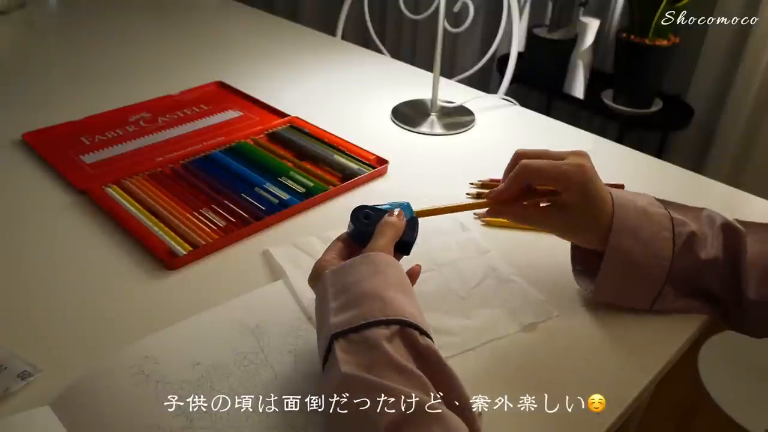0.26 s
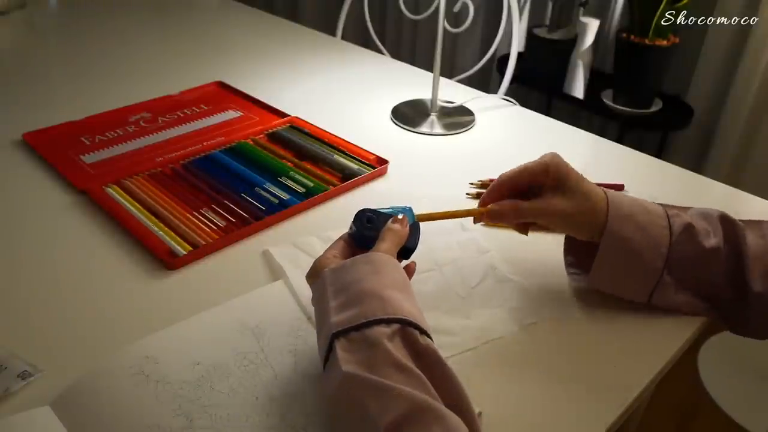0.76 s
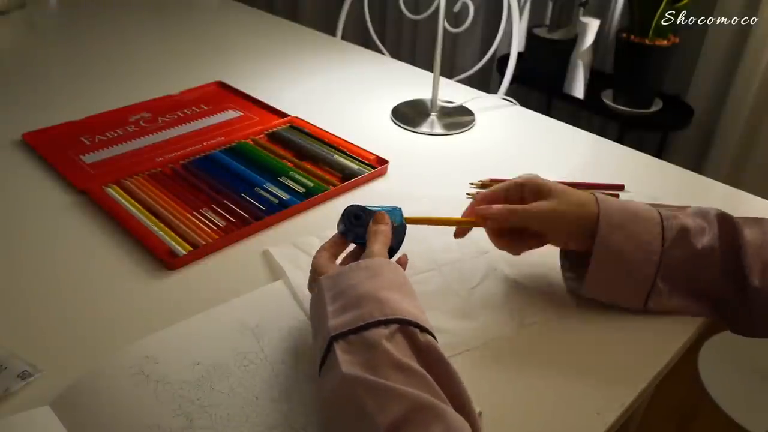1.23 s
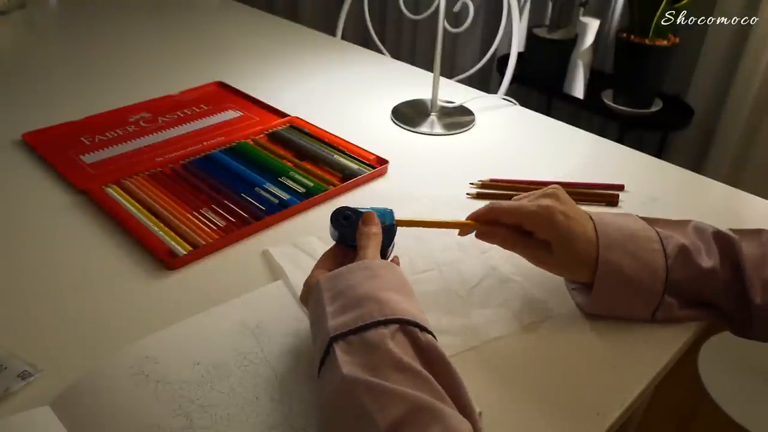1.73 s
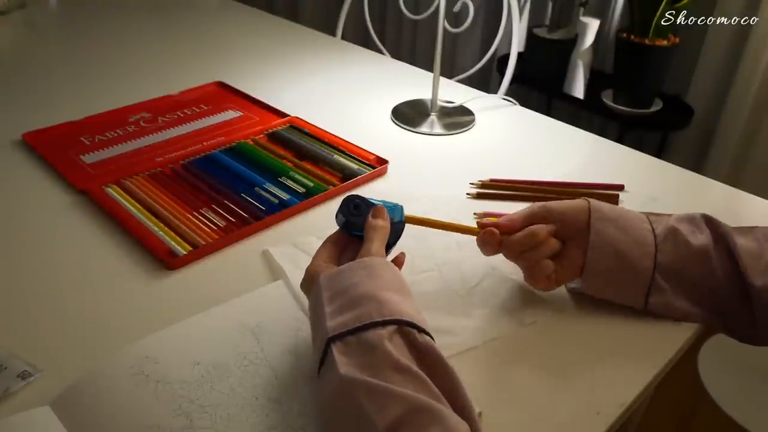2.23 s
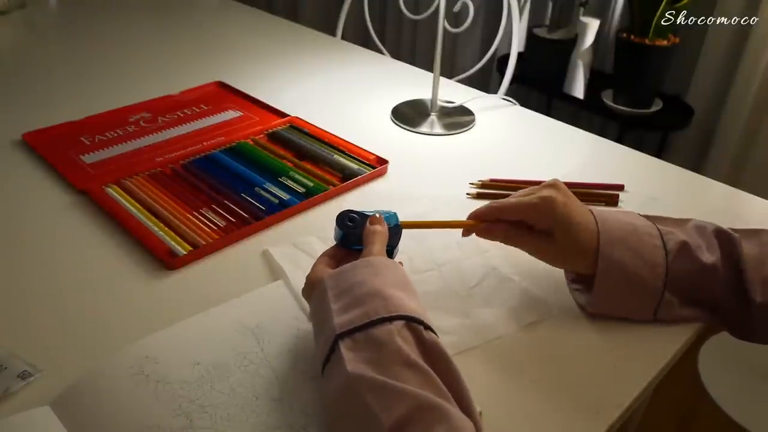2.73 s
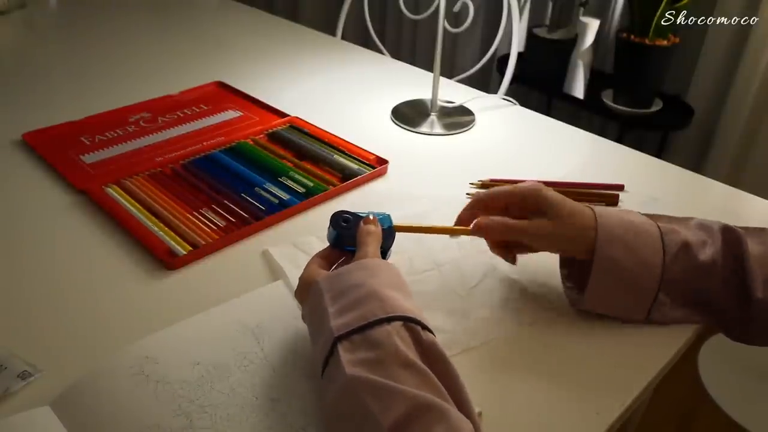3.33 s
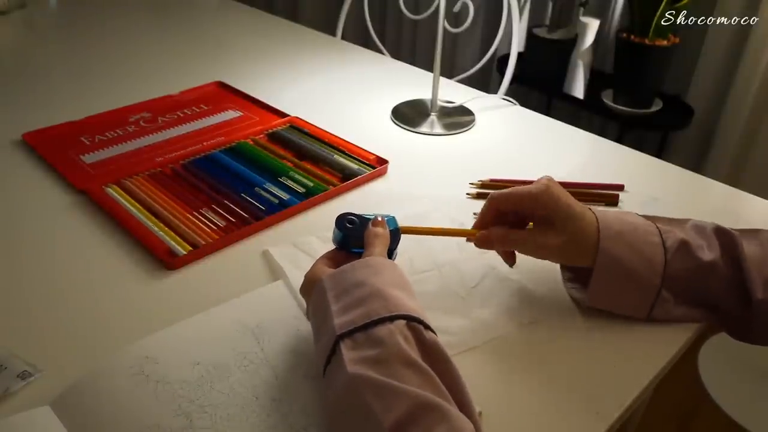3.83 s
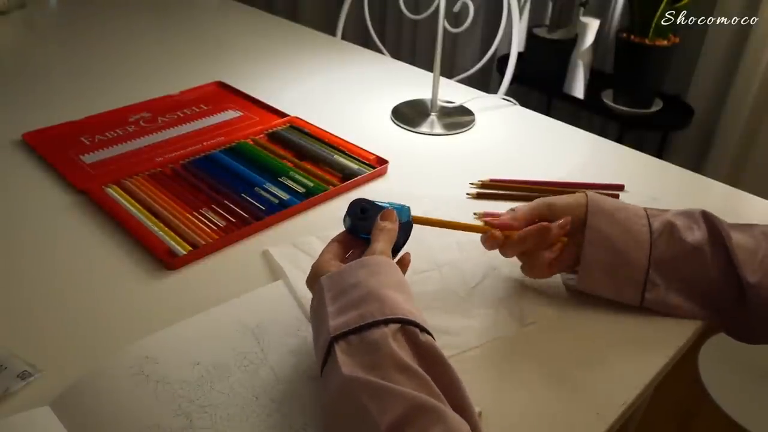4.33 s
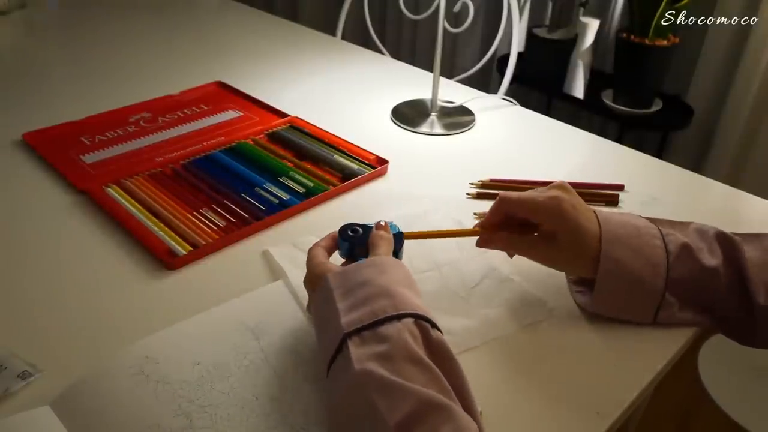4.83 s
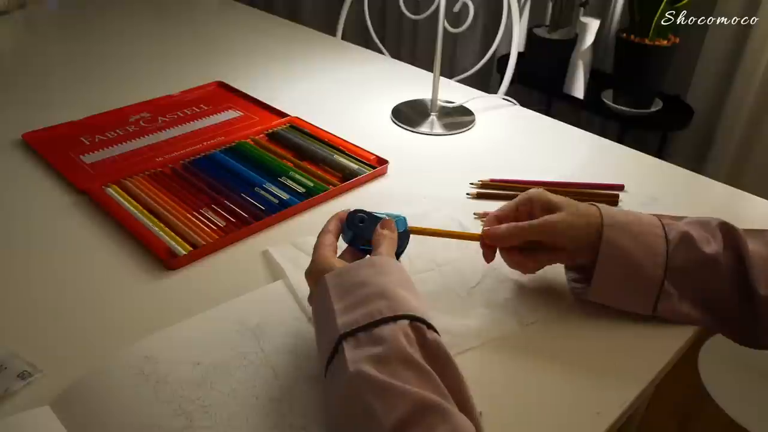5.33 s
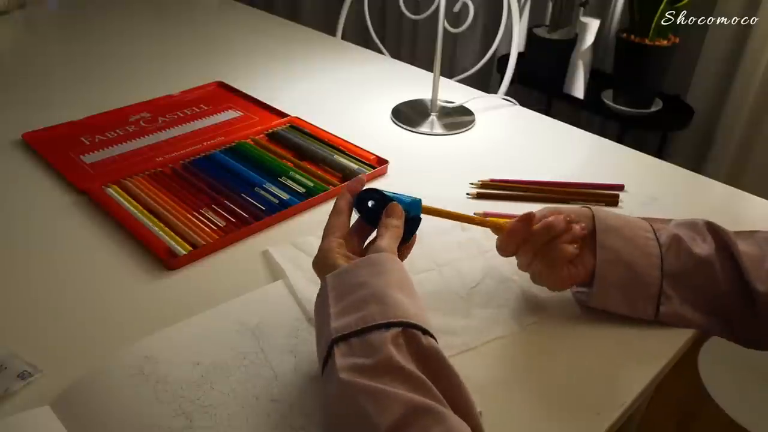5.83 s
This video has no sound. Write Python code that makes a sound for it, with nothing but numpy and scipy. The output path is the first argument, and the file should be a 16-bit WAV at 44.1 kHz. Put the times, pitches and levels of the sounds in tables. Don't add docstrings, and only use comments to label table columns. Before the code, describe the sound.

A wooden pencil is twisted in a small plastic sharpener in crisp separate scrapes with sharp snaps, while water faintly trickles and plops in a quiet room.

```python
import sys
import numpy as np
from scipy import signal
from scipy.fft import rfft, irfft, next_fast_len
from scipy.io import wavfile

SR = 44100
rng = np.random.default_rng(int(sys.argv[2]) if len(sys.argv) > 2 else 0)


def dump(signal):
    limited = np.clip(np.atleast_2d(signal).T, -1, 1)
    pcm = np.round(limited * 32767).astype(np.int16)
    wavfile.write(sys.argv[1], SR, pcm)


def boost(x):
    u = np.asarray(x, float) / 20
    return 10 ** u


N = 267687


def rms_one(x):
    return x / np.sqrt(np.mean(x ** 2) + 1e-20)


def in_time(rows):
    s, *columns = np.transpose(rows)
    return [np.interp(np.arange(N) / SR, s, column) for column in columns]


def at_hz(points, hz):
    point_hz, value = np.transpose(points)
    return np.interp(np.log(hz), np.log(point_hz), value)


def drift(rate_hz):
    r = np.exp(-2 * np.pi * rate_hz / SR)
    white = rng.standard_normal(N + SR)
    return rms_one(signal.lfilter([1], [1, -2 * r, r * r], white)[SR:])


def body(x, modes, order=1, sway=None):
    out = 0
    for k, (hz, width_hz, level_db) in enumerate(modes):
        r = np.exp(-np.pi * width_hz / SR)
        section = [(1 - r * r) / 2, 0, (r * r - 1) / 2, 1, -2 * r * np.cos(2 * np.pi * hz / SR), r * r]
        gain = boost(level_db)
        if sway is not None:
            gain = gain * sway[k % len(sway)]
        sign = (-1) ** k
        out = out + sign * gain * signal.sosfilt([section] * order, x)
    return out


def grains(per_s, spread_db, clump_db, clump_hz):
    uneven_db = spread_db * np.minimum(rng.exponential(1, N), 4)
    sizes = boost(uneven_db + clump_db * drift(clump_hz))
    signs = rng.choice([-1, 1], N)
    struck = rng.random(N) < per_s / SR
    return rms_one(sizes * signs * struck)


# (time [s], blade level [dB])
PULLS = [
    [(0.64, -64), (0.67, -52.5), (0.79, -45.5), (0.99, -48.5), (1.05, -38.5), (1.08, -33.5), (1.125, -48),
     (1.23, -66)],
    [(1.908, -37), (1.914, -49), (1.951, -50), (2.043, -53), (2.135, -42.5), (2.247, -43), (2.315, -63.5),
     (2.345, -64)],
    [(2.778, -42), (2.785, -41.5), (2.843, -50), (3.027, -40.5), (3.075, -43.5), (3.105, -36.5),
     (3.233, -53.5), (3.4, -77.5)],
    [(3.75, -67), (3.791, -65), (3.949, -51), (4.053, -45.5), (4.101, -48)],
    [(4.11, -40.5), (4.148, -43), (4.23, -43), (4.284, -41), (4.34, -49), (4.406, -67), (4.432, -66)],
    [(4.9, -65), (4.95, -59.5), (4.988, -65), (4.996, -49.5), (5.078, -52.5), (5.116, -59)],
    [(5.127, -47), (5.175, -54.5), (5.24, -49.5), (5.29, -46.5), (5.44, -51.5), (5.455, -54.5), (5.5, -47),
     (5.516, -42)],
    [(5.524, -34.5), (5.548, -37.5), (5.76, -48), (5.784, -48), (5.885, -52.5), (5.94, -82)],
]
# (shell level [dB], pencil level [dB], shaving level [dB],
# pencil gain through the pull [dB], shell gain through the pull [dB])
GRIPS = [(-16, -7.5, 0.8, 13, 3), (-11.5, -2.5, 2.5, -9, -1), (-14, -1.5, 1, 5, -2), (-10, -8.5, 3, 12, 7),
         (-11.5, 1, 5, 7, 3), (-1, 3.5, 3, -2, -12), (-2, 1.5, 3.5, -3, -7), (-13, -3, 1, 8, 1)]
# (time [s], blade level [dB])
REST = [(0, -67), (.55, -68), (1.3, -68), (1.85, -71), (2.38, -63), (2.46, -67.5), (2.7, -70), (3.7, -73),
        (4.5, -66), (4.9, -68), (6.07, -71.5)]


def twist():
    fidget_db, shell_swell_db, shaving_yield = 2.5, 2.5, 0.05
    t = np.arange(N) / SR
    blade_db = in_time(REST)[0] + fidget_db * drift(6.8)
    shell_db, pencil_db, shaving_db = np.full(N, -4.), np.full(N, -1.5), np.full(N, -2.5)
    for pull, (shell, pencil, shaving, pencil_gain, shell_gain) in zip(PULLS, GRIPS):
        s, db = np.transpose(pull)
        inside = (t >= s[0]) & (t < s[-1] + .01)
        along = np.clip((t[inside] - s[0]) / (s[-1] - s[0]), 0, 1)
        blade_db[inside] = np.interp(t[inside], s, db)
        swell_db = shell_swell_db * (np.sin(np.pi * along) - .5)
        shell_db[inside] = shell + shell_gain * (along - .5) + swell_db
        pencil_db[inside] = pencil + pencil_gain * (along - .5)
        shaving_db[inside] = shaving - shaving_yield * (blade_db[inside] + 48)
    return blade_db, shell_db, pencil_db, shaving_db


# (time [s], on the blade [0-1], in the cone [0-1])
SEAT = [(.66, 0.05, .01), (.85, 0.14, .01), (1.0, 0.06, 0.17), (1.2, 0.2, 0.24), (1.9, 0.54, 0.5),
        (2.1, 1, 0.22), (2.3, 0.55, 0.66), (2.9, 1, 0.97), (3.1, 0.92, 0.83), (3.8, .98, 0.55),
        (4.15, 0.27, 0), (4.3, 0.25, 0.38), (5.0, .8, 0.5), (5.15, 0.3, 0.17), (5.3, 0.3, 0.17),
        (5.5, 0, 0.13), (5.58, 0.2, 0.23), (5.9, 0.7, 0.3)]
# (frequency [Hz], width [Hz], level [dB])
BLADE_LOOSE = [(6160, 490, 21), (6530, 2000, -2.5), (7900, 720, -20)]
BLADE_TIGHT = [(6695, 1210, 5.7), (6910, 2270, 0.44), (7850, 1100, 2.7)]
# (frequency [Hz], width [Hz], level [dB])
PENCIL_LOOSE = [(3170, 400, -10), (4700, 750, 0), (5600, 900, -2)]
PENCIL_TIGHT = [(3450, 720, 7.5), (4220, 610, 12.9), (4790, 820, 7.3)]
# (frequency [Hz], width [Hz], level [dB])
SHELL = [(924, 670, -1.5), (1707, 167, 3), (1824, 166, 7), (1902, 860, -1), (2900, 1120, -10)]
# (frequency [Hz], width [Hz], level [dB])
SHAVING = [(8530, 2900, -5), (10550, 1870, -7), (12360, 2050, -5), (13170, 490, -4.5), (14150, 3700, -3),
           (15000, 3400, -8)]


def scrape(blade_db, shell_db, pencil_db, shaving_db):
    on_blade, in_cone = np.clip(in_time(SEAT), 0, 1)
    rub = boost(-2) * rng.standard_normal(N)
    tear = grains(5000, spread_db=2.6, clump_db=2.2, clump_hz=130) + rub
    grip = [boost(3.2 * drift(3)) for finger in range(4)]

    def rung(modes):
        return rms_one(body(tear, modes, order=2, sway=grip))

    blade = np.sqrt(1 - on_blade) * rung(BLADE_LOOSE) + np.sqrt(on_blade) * rung(BLADE_TIGHT)
    pencil = np.sqrt(1 - in_cone) * rung(PENCIL_LOOSE) + np.sqrt(in_cone) * rung(PENCIL_TIGHT)
    parts = blade + boost(pencil_db) * pencil
    parts = parts + boost(shell_db) * rung(SHELL) + boost(shaving_db) * rung(SHAVING)
    return boost(blade_db - 2.5) * parts


# (time [s], peak level [dB], pitch [Hz], relative level of shell and pencil [dB])
SNAPS = [(0.7647, -30.5, 5700, -11), (0.8797, -33.5, 6100, -20), (1.0002, -31, 7800, -7),
         (1.0113, -31, 8800, -6), (1.0693, -21.5, 5770, -29), (1.092, -35, 5000, -10),
         (1.8812, -38, 6340, -2), (1.9097, -31, 11000, -16), (2.0933, -32, 8040, -2),
         (2.3623, -39, 13000, -10), (2.7767, -13.5, 7600, -16), (2.8502, -24, 7740, -9),
         (2.876, -32, 7800, -3), (2.906, -26, 7550, -16), (3.0183, -31, 8260, 0), (3.127, -22, 7140, -9),
         (3.7866, -38.5, 7860, -11), (3.8539, -36, 7900, -17), (4.0794, -28, 5200, -1),
         (4.1043, -19, 5300, -12), (4.2755, -23.5, 8400, -21), (4.9465, -42, 2000, -7),
         (4.9922, -33.5, 7900, -19), (5.0475, -29.5, 10260, -4), (5.1223, -21.5, 3240, -12),
         (5.265, -31, 4400, -12), (5.4489, -31, 5000, 3), (5.479, -27, 5860, 3), (5.52, -24, 7800, -14),
         (5.779, -27, 7600, 0)]


def snaps(rows):
    out, t = np.zeros(N + SR), np.arange(SR // 20) / SR
    fall = np.exp(-t / 0.00074) + boost(-20.5) * np.exp(-t / 0.065)
    cracks = rng.standard_normal((170, len(t))) * fall
    for (s, peak_db, hz, low_db), crack in zip(rows, cracks):
        low = body(crack, PENCIL_LOOSE, order=2) + boost(-15.5) * body(crack, SHELL, order=2)
        sound = body(crack, BLADE_TIGHT + SHAVING, order=2) + boost(low_db + 6.5) * low
        sound += boost(5) * body(crack, [(hz, 400, 0)])
        start = round(s * SR)
        out[start:start + len(t)] += boost(peak_db + 1.5) * sound / np.abs(sound).max()
    return out[:N]


def ticks(blade_db):
    gap_s, over_db, spread_db, low_db = .036, 8, 1.5, -9
    lowest_hz, highest_hz = 4430, 8840
    luck = rng.random((170, 3))
    s = np.clip((np.arange(len(luck)) + luck[:, 0]) * gap_s, 0, (N - 1) / SR)
    effort_db = blade_db[(s * SR).astype(int)]
    peak_db = effort_db + over_db - spread_db * np.log(luck[:, 1] + .05)
    hz = lowest_hz + (highest_hz - lowest_hz) * luck[:, 2]
    return [(a, b, c, low_db) for a, b, c in zip(s, peak_db, hz) if b > -47]


# (time [s], length [s], level [dB])
RUSTLES = [
    (0.169, 0.095, -57.5),
    (1.617, 0.049, -68),
    (2.35, 0.03, -63.5),
    (0.73, 0.33, -60),
    (3.68, 0.48, -60.5),
]
# (frequency [Hz], width [Hz], level [dB])
SLEEVE = [(2170, 1100, -0.5), (2650, 710, 3), (5000, 2800, -8.5), (7840, 3000, -34)]


def sleeve():
    t, swell = np.arange(N) / SR, 0
    for s, length_s, level_db in RUSTLES:
        along = np.clip((t - s) / length_s, 0, 1)
        swell = swell + boost(level_db) * np.sin(np.pi * along)
    return swell * rms_one(body(grains(7400, spread_db=9.0, clump_db=5.0, clump_hz=130), SLEEVE))


def tabletop(x):
    left_lag_s, right_lag_s, echo_db = .00042, .00057, -17
    return np.array([x + boost(echo_db) * np.roll(x, round(lag_s * SR)) for lag_s in (left_lag_s, right_lag_s)])


# (time [s], peak level [dB])
PLOPS = [(0.275, -26.5), (0.632, -34.5), (0.867, -34), (1.067, -34), (1.168, -34.5), (1.393, -21.5),
         (1.483, -33), (1.549, -32.5), (1.918, -41), (1.984, -35), (2.418, -33), (3.06, -26.5),
         (3.318, -36), (3.453, -31.5), (3.586, -31.5), (3.652, -32), (3.82, -32), (4.353, -35),
         (4.42, -32.5), (4.896, -30.5), (5.154, -48), (5.356, -50), (5.589, -31.5), (5.722, -37)]
# (time [s], level [dB])
TRICKLE = [(0.0, -98), (0.32, -56.5), (0.51, -52), (1.23, -64), (1.6, -55.5), (2.5, -57.5), (2.9, -65),
           (3.23, -52.5), (3.67, -52), (4.82, -62.5), (5.11, -54.5), (6.07, -56.5)]
# (frequency [Hz], width [Hz], level [dB])
VESSEL = [(410, 8.3, -0.5), (509.5, 17, -4), (550, 72, -19), (663.6, 17, -12), (1100, 290, -23.5)]


def water():
    base_hz, hz_per_db = 649, 3.5
    out, t = np.zeros(N + SR), np.arange(SR // 20) / SR
    for s, peak_db in PLOPS:
        hz = base_hz + hz_per_db * (peak_db + 37.5)
        turns = hz * (t - 0.24 * 0.0039 * (1 - np.exp(-t / 0.0025)))
        wave = np.sin(2 * np.pi * turns) + boost(-11) * np.sin(4 * np.pi * turns)
        shape = (1 - np.exp(-t / 0.0039)) * np.exp(-t / 0.0023)
        start = round(s * SR)
        out[start:start + len(t)] += boost(peak_db + 2.5) * shape * wave
    plops = out[:N]
    trickle = rms_one(body(grains(250, spread_db=2.5, clump_db=2.5, clump_hz=10), VESSEL))
    return plops + boost(15.0) * body(plops, VESSEL) + boost(in_time(TRICKLE)[0] - 4.5) * trickle


def room(x):
    t60_s, wall_cut_hz = 0.094, 60000
    size = next_fast_len(N + SR)
    w = 2 * np.pi * np.arange(size // 2 + 1) / size
    dull = 1 / (1 + 1j * w * SR / (2 * np.pi * wall_cut_hz))
    out, spectrum = np.zeros((2, len(w)), complex), rfft(x, size)
    lags = (rng.uniform(.004, .03, 16) * SR).astype(int)
    for k, lag in enumerate(lags):
        loop = boost(-60 * lag / SR / t60_s) * dull * np.exp(-1j * w * lag)
        out[k % 2] += (-1) ** (k // 2) * loop / (1 - loop)
    return irfft(out * spectrum, size)[:, :N]


# (frequency [Hz], density [dB per Hz])
FLOOR = [(22, 0.5), (50, -2), (100, -9), (200, -5.5), (500, -7.5), (750, -12), (1300, -16), (1900, -29),
         (2600, -28.5), (3600, -23.5), (5400, -29.5), (7000, -23.5), (10000, -28), (15500, -23)]
# (frequency [Hz], correlation [0-1])
LIKENESS = [(60, .97), (250, .97), (1000, .95), (2500, .86), (15000, .8)]
# (frequency [Hz], width [Hz], level [dB])
HUM = [(43.5, 4, 0), (70, 14, -7)]


def floor():
    out, edges = 0, 22 * 2 ** np.arange(0, 9.7, 1 / 4)
    white = rng.standard_normal((2, 2, N + SR))
    for k, (low, high) in enumerate(zip(edges, edges[1:])):
        band = signal.butter(2, [low, high], "band", fs=SR, output="sos")
        mid, side = signal.sosfilt(band, white[k % 2])[:, SR:]
        hz = np.sqrt(low * high)
        alike = np.clip(at_hz(LIKENESS, hz), 0, 1)
        stereo = np.sqrt(1 + alike) * mid + np.sqrt(1 - alike) * side * [[1], [-1]]
        out = out + boost(at_hz(FLOOR, hz)) * stereo
    hum = rms_one(body(white[0, 0], HUM)[SR:])
    return boost(-55.0) * rms_one(out) + boost(-66.0) * hum


def scene():
    levels = twist()
    near = scrape(*levels) + sleeve() + snaps(SNAPS) + snaps(ticks(levels[0]))
    far = water()
    reverberant = boost(-11.5) * room(near + boost(-8.5) * far)
    return tabletop(near) + far + reverberant + floor()


def band_limit(x):
    return signal.sosfilt(signal.butter(12, 16840, fs=SR, output="sos"), x)


def record(dry):
    top = signal.ellip(12, .5, 75, 15680, fs=SR, output="sos")
    rumble = signal.butter(2, 24, "high", fs=SR, output="sos")
    mix = signal.sosfilt(np.vstack([top, rumble]), dry)
    return band_limit(mix)


dry = scene()
out = record(dry)
dump(out)
```